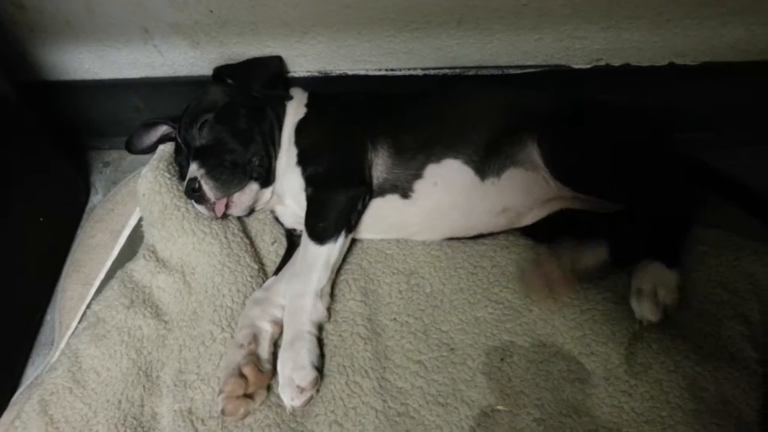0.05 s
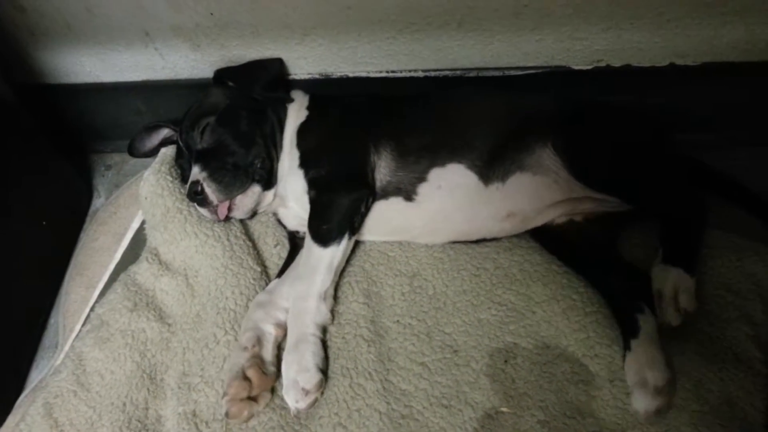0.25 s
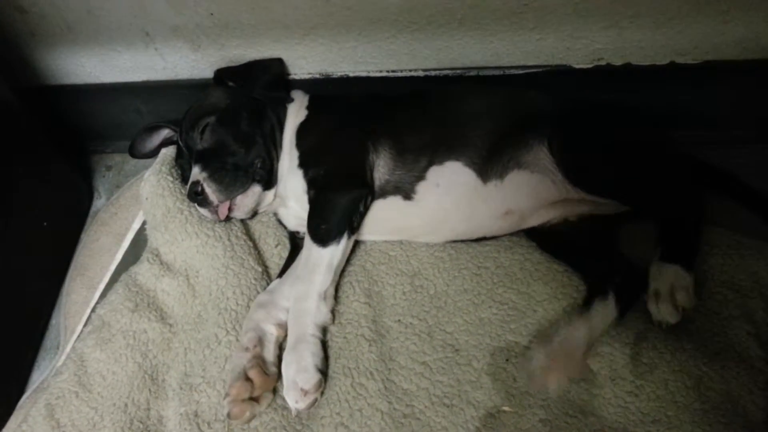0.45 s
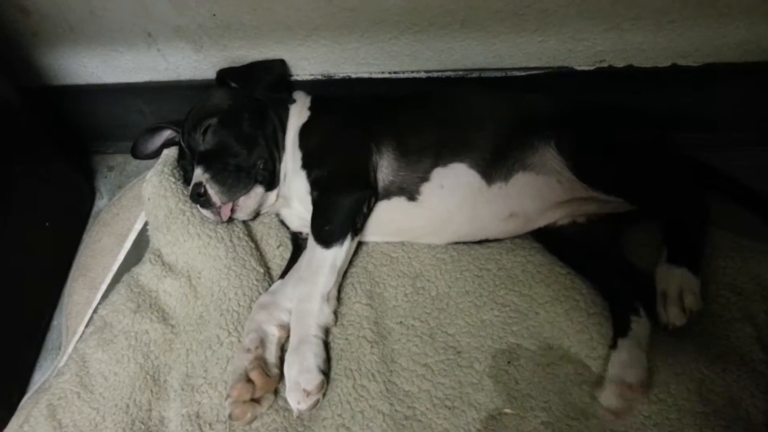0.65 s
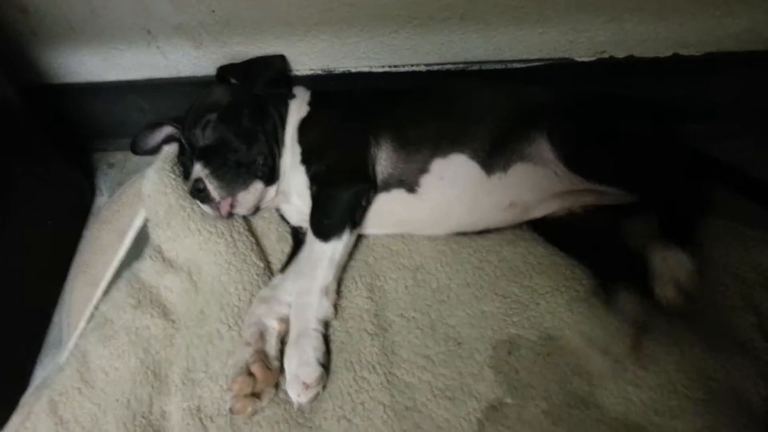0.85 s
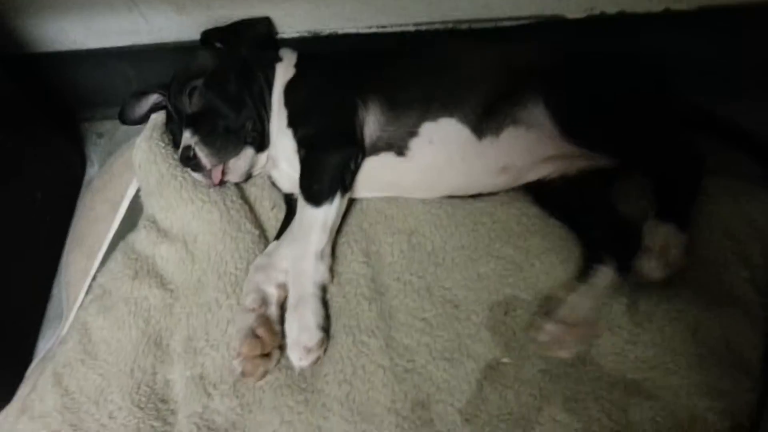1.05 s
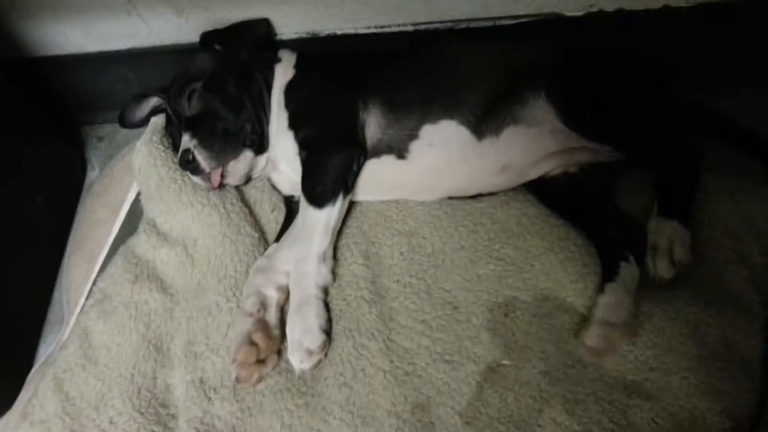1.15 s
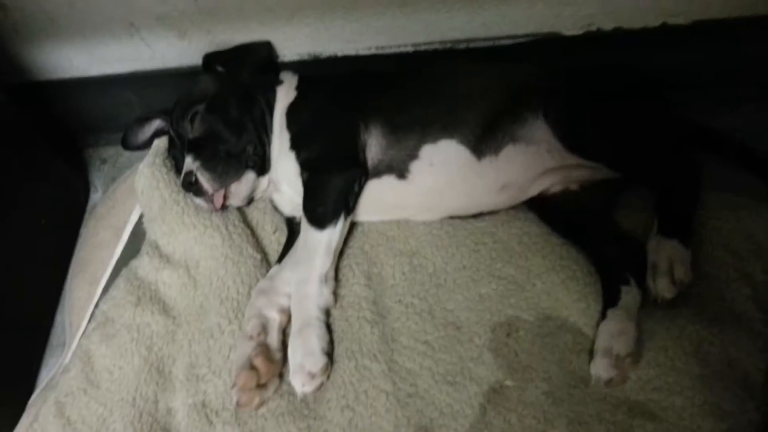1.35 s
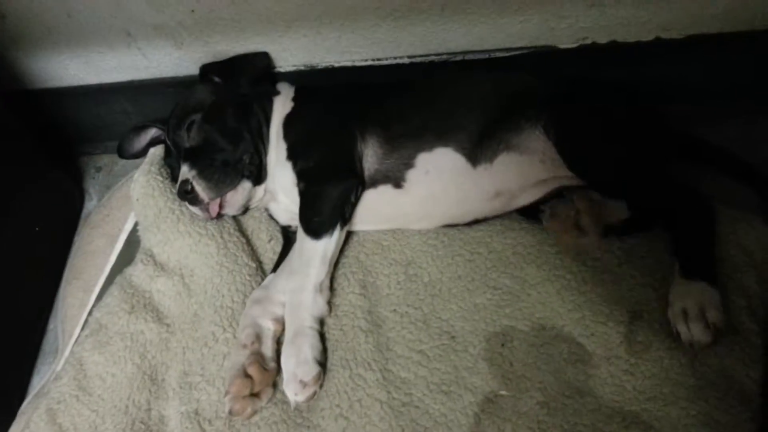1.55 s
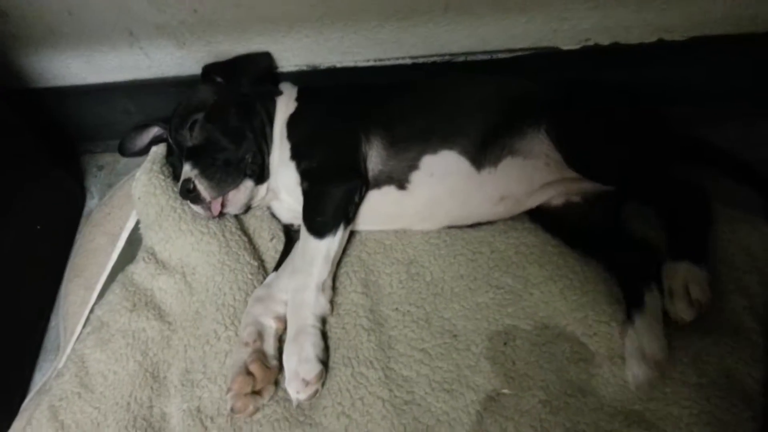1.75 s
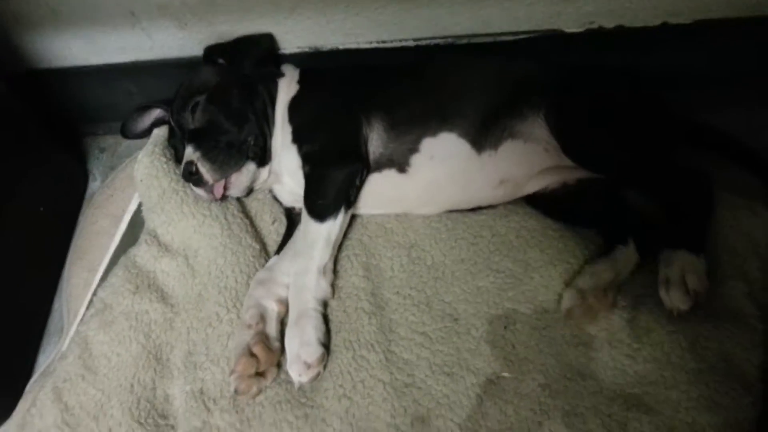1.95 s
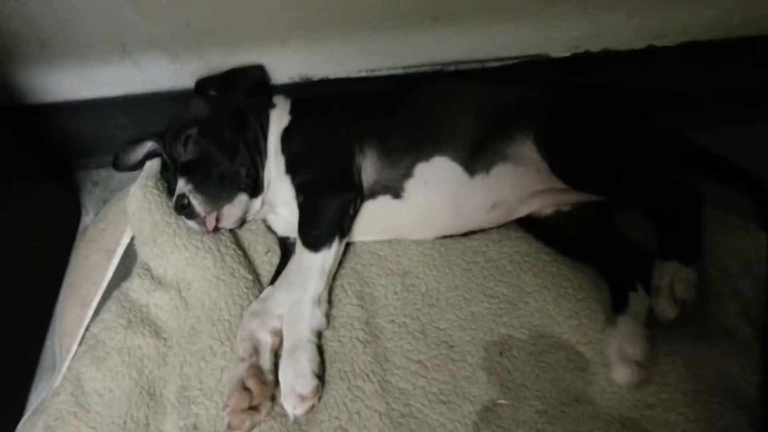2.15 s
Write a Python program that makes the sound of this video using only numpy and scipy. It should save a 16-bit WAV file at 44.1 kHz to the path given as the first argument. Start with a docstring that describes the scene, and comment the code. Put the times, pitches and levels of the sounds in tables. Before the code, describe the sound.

A sleeping puppy woofs softly four times with its mouth shut, each a hollow hoot with a thin squeak and husky rasp. Its legs faintly brush the blanket, over low hum and hiss in a bare, echoing room.

```python
"""In a bare, ringing room, a sleeping puppy woofs four times with its mouth shut.
Its vocal folds make thin squeaks and hollow, sagging hoots; the last three woofs open with a
hoarse upward slide. Air rushing through its throat adds a husky rasp.
Its twitching legs brush the blanket and bump the cushion, and lips and claws tick,
all over a faint hum and hiss."""
import sys
import numpy as np
from scipy import signal
from scipy.fft import rfft, irfft
from scipy.io import wavfile
from scipy.ndimage import uniform_filter1d, minimum_filter1d

SR = 44100
rng = np.random.default_rng(int(sys.argv[2]) if len(sys.argv) > 2 else 0)


def digitize_waveform(pressure):
    """Quantize a signal to 16-bit integers and store it at the path in sys.argv[1].

    Rows of a 2-D input are taken as channels; values are limited to [-1, 1].
    """
    field = np.atleast_2d(pressure).T
    bounded = np.clip(field, -1, 1)
    quanta = np.round(bounded * 32767).astype(np.int16)
    wavfile.write(sys.argv[1], SR, quanta)


N = 97020
T = np.arange(N) / SR

# tone colour of the room's hiss: f/Hz, level/dB
HISS_COLOUR = [(25, -19), (50, -13.5), (80, -4.5), (125, -9), (170, 0), (240, 8), (400, 8), (900, 8.5),
               (1700, -2), (2800, -9), (6000, -18.5), (14000, -20.5)]
# low hum: f/Hz, width/Hz, level/dB
HUM_TONES = [(80, 5.8, -60.5), (127, 19, -52)]
# how long the room's echo takes to fall by 60 dB: f/Hz, t/s
ECHO_TIMES = [(150, .8), (500, 1.29), (850, 1.3), (2000, 1.3), (5000, 2), (14000, .5)]
# tone colour of the brushed blanket: f/Hz, level/dB
BLANKET_COLOUR = [(40, -50), (300, -22), (1500, -7.5), (2800, -7.5), (4200, -7.5), (4550, 0), (4780, 1.5),
                  (5050, -2.5), (5600, -5), (8200, -5), (9200, -8), (10200, -7), (11400, -19),
                  (12800, -15.5), (13800, -2.5), (15000, -29.5)]
# how loud the brushing is: t/s, level/dB
BRUSH_LEVELS = [(0, -60), (.05, -46), (.11, -46.5), (.19, -56), (.29, -46.5), (.39, -47.5), (.43, -39),
                (.5, -47.5), (.67, -58), (1.12, -55.5), (1.16, -52), (1.4, -52.5), (1.76, -59), (1.94, -45),
                (2.07, -46), (2.15, -41.5), (2.2, -41)]
# paw bumps on the cushion: t/s, level/dB, f/Hz
PAW_THUDS = [(0.129, -42.5, 123.4), (1.832, -45, 122), (2.154, -42.5, 131.5)]
# ticks of lips and claws: t/s, level/dB, f/Hz, width/Hz, decay/s
SMALL_TICKS = [(.298, -33.5, 3320, 915, .005), (1.145, -50, 8330, 200, .04)]
# tone colour of air in the throat: f/Hz, level/dB
THROAT_COLOUR = [(40, -55), (110, -23.5), (250, -15), (380, -12), (440, 4.5), (650, 0), (900, 5.5),
                 (1080, -4), (1350, -4), (1750, -12), (2350, -19), (2650, -26), (4000, -35), (8000, -42.5),
                 (15000, -68)]
# rasp of each woof: t/s, length/s, level/dB, brightness/(dB per octave)
THROAT_RASPS = [(-.05, 0.058, -42.5, 6), (0.158, 0.23, -26, 2), (0.689, 0.18, -26, 0.5),
                (1.195, 0.26, -27, 0.5), (1.747, 0.2, -27.5, -2)]
# slides that open a woof: t/s, length/s, level/dB, start f/Hz, top f/Hz
RISING_SLIDES = [(0.646, 0.057, -33, 623, 833.6), (1.165, .07, -31.5, 549, 829.5),
                 (1.723, 0.0622, -32.5, 552.2, 832.5)]
# high voice: t/s, length/s, level/dB, start f/Hz, end f/Hz, jitter/share of pitch,
# half-pitch tones/dB, octave/dB
HIGH_SQUEAKS = [(-.02, 0.04, -36, 900, 834.4, 0.011, -32, -15.5),
                (.005, 0.059, -43, 942, 1017, 0.021, -25, -16),
                (0.088, 0.097, -35, 867.5, 850, 0.022, -17, -20.5),
                (0.245, 0.098, -22.5, 809.3, 821.4, .02, -52, -30.5),
                (0.663, 0.081, -33, 820, 819, 0.026, -30, -26),
                (1.225, 0.19, -24, 848.3, 827, .03, -19.5, -24),
                (1.806, 0.048, -22, 847.8, 848.4, 0.012, -15.5, -21.5),
                (1.932, 0.17, -29.5, 857, 845.5, 0.01398, -18.5, -24.5)]
# low hoots as heard in the ringing room, often swelling several times per woof:
# t/s, length/s, level/dB, start f/Hz, end f/Hz, jitter/share of pitch, overtones/dB
LOW_HOOTS = [(0.152, 0.063, -30, 575, 551, 0.021, -26), (0.225, .045, -17, 567.8, 566.2, 0.0087, -16.5),
             (.276, 0.055, -14, 567.5, 569, .004, -15.5), (0.379, .02, -25, 568.3, 562.3, .004, -33),
             (0.71, 0.074, -17.5, 548.1, 508.5, 0.019, -34.5), (0.805, .14, -15.5, 536, 497.9, 0.036, -40),
             (1.252, 0.094, -17.5, 518.8, 503, 0.057, -30), (1.351, 0.12, -18.5, 522.6, 481.4, 0.045, -31),
             (1.549, .015, -30.5, 496, 478, 0.009, -35), (1.804, 0.15, -26, 557.3, 478.8, 0.0961, -26)]

# direct sound compared with its echo, for hoots, higher tones and rough sounds
HOOT_DIRECT_DB, HIGH_DIRECT_DB, ROUGH_DIRECT_DB = 3, 2, -11


def amp(db):
    """Turns decibels into a gain."""
    return 10 ** (np.asarray(db) / 20)


def unit(x):
    """Scales a signal to an average strength (rms) of one."""
    return x / np.sqrt(np.mean(x ** 2) + 1e-20)


def look_up(points, hz):
    """Reads between the rows of a table, with pitch spaced in octaves."""
    f, value = np.transpose(points)
    return np.interp(np.log(hz + 1), np.log(f + 1), value)


def noise(colour):
    """Noise with the given tone colour."""
    gains = amp(look_up(colour, np.fft.rfftfreq(N, 1 / SR)))
    return unit(irfft(rfft(rng.standard_normal(N)) * gains, N))


def wander(rate_hz):
    """A smooth random wobble, mostly slower than the given rate."""
    gains = np.exp(-(np.fft.rfftfreq(N, 1 / SR) / rate_hz) ** 2)
    return unit(irfft(rfft(rng.standard_normal(N)) * gains, N))


def fuzzy_tone(hz, width):
    """A band of noise around one pitch."""
    wobble = wander(width) + 1j * wander(width)
    return unit((wobble * np.exp(2j * np.pi * hz * T)).real)


def background(hiss_db=-41):
    """Room hiss and a wavering low hum."""
    hiss = amp(hiss_db) * noise(HISS_COLOUR)
    return hiss + sum(amp(db) * fuzzy_tone(hz, width) for hz, width, db in HUM_TONES)


def in_room(x, direct_db):
    """Adds the echo of bare walls; the result has the energy of half a second at 0 dB."""
    hz, t, spectrum = signal.stft(rng.standard_normal(N), SR, nperseg=256)
    decay = amp(-60 * t / look_up(ECHO_TIMES, hz)[:, None])
    tail = signal.istft(spectrum * decay, SR, nperseg=256)[1][:N]
    echo = signal.fftconvolve(x, tail)[:N]
    return unit(amp(direct_db) * unit(x) + unit(echo)) * np.sqrt(.5 * SR / N)


def blanket(grain_db=1, grain_s=.006):
    """Paws drag over the blanket in fine, uneven grains."""
    level = amp(np.interp(T, *np.transpose(BRUSH_LEVELS)))
    return level * noise(BLANKET_COLOUR) * unit(amp(grain_db * wander(1 / grain_s)))


def thud(start, db, hz, rise_s=.02):
    """A paw bumps the cushion: a low tone swells and dies."""
    age = np.maximum(T - start, 0)
    return amp(db) * age / rise_s * np.exp(1 - age / rise_s) * np.sin(2 * np.pi * hz * age)


def tick(start, db, hz, width, decay):
    """A lip or claw makes a tiny, quickly dying scratch."""
    return amp(db) * fuzzy_tone(hz, width) * (T > start) * np.exp(-np.maximum(T - start, 0) / decay)


def rasp(start, length, db, tilt_db):
    """Air swirling in the throat swells and fades with each woof."""
    progress = np.clip((T - start) / length, 0, 1)
    swell = abs(np.sin(np.pi * progress ** .62))
    colour = [(hz, level + tilt_db * np.log2(hz)) for hz, level in THROAT_COLOUR]
    return amp(db) * in_room(swell * noise(colour), ROUGH_DIRECT_DB)


def vocal_folds(start, length, from_hz, to_hz, jitter, bend=1):
    """Loudness and phase of a shaky, gliding voice; a bend above 1 makes the glide come late."""
    attack_s, release_s, fade_db, shake_hz = .014, .04, -6.5, 68
    age = T - start
    progress = np.clip(age / length, 0, 1)
    release = np.exp(-np.maximum(age - length, 0) / min(release_s, length))
    level = np.clip(age / attack_s, 0, 1) * amp(fade_db * progress) * release
    glide = from_hz + (to_hz - from_hz) * progress ** bend
    hz = glide * (1 + jitter * wander(shake_hz))
    tremble = np.exp(.12 * wander(shake_hz))
    return level * tremble, 2 * np.pi * np.cumsum(hz) / SR


def slide(start, length, db, from_hz, to_hz, break_s=.031):
    """The hoarse voice swells as it climbs, then breaks off."""
    level, phase = vocal_folds(start, length, from_hz, to_hz, jitter=.05)
    swell = amp(14 * np.clip((T - start) / length, 0, 1))
    break_off = np.exp(-np.maximum(T - start - length, 0) / break_s)
    hoarse_tone = np.sin(phase + .8 * wander(rate_hz=110))
    return amp(db) * in_room(level * swell * break_off * hoarse_tone, HIGH_DIRECT_DB)


def squeak(start, length, db, from_hz, to_hz, jitter, half_db, octave_db):
    """A thin, high tone; strong and weak cycles add tones at 1, 3 and 5 times half its pitch."""
    level, phase = vocal_folds(start, length, from_hz, to_hz, jitter)
    halves = np.sin(phase / 2) + np.sin(3 * phase / 2) + amp(-11) * np.sin(5 * phase / 2)
    roughness = 1 + .75 * wander(rate_hz=45)
    extras = level * roughness * (amp(half_db) * halves + amp(octave_db) * np.sin(2 * phase))
    extras_gain = np.hypot(np.sqrt(2) * amp(half_db), amp(octave_db))
    tone = in_room(level * np.sin(phase), HIGH_DIRECT_DB)
    return amp(db) * (tone + extras_gain * in_room(extras, ROUGH_DIRECT_DB))


def hoot(start, length, db, from_hz, to_hz, jitter, overtone_db, flutter_hz=31):
    """A nearly pure tone that tends to sag, with a fast flutter in loudness; shut lips muffle it."""
    level, phase = vocal_folds(start, length, from_hz, to_hz, jitter, bend=1.84)
    flutter = np.sin(2 * np.pi * flutter_hz * (T - start) + wander(flutter_hz / 2))
    level = level * (1 + min(7.9 * jitter, 1) * flutter)
    roughness = 1 + .31 * wander(rate_hz=40)
    overtones = level * roughness * (np.sin(2 * phase) + amp(-20.5) * np.sin(3 * phase))
    tone = in_room(level * np.sin(phase), HOOT_DIRECT_DB)
    return amp(db) * (tone + amp(overtone_db) * in_room(overtones, HIGH_DIRECT_DB))


def scene():
    """Adds the room, the bedding and the puppy into one channel."""
    mix = blanket() + background()
    sources = [(hoot, LOW_HOOTS), (squeak, HIGH_SQUEAKS), (slide, RISING_SLIDES),
               (rasp, THROAT_RASPS), (tick, SMALL_TICKS), (thud, PAW_THUDS)]
    for source, rows in sources:
        mix += sum(source(*row) for row in rows)
    return mix[None]


def record(dry):
    """Turns down any peak above full scale, then trims the deepest bass and highest treble."""
    low_cut_hz, high_cut_hz, window = 44, 14700, 221  # the window lasts 5 ms
    gain = uniform_filter1d(minimum_filter1d(1 / np.maximum(abs(dry), 1), window), window)
    bass_cut = signal.butter(2, low_cut_hz, "highpass", fs=SR, output="sos")
    treble_cut = signal.firwin(511, high_cut_hz, window=("kaiser", 9), fs=SR)
    return signal.oaconvolve(signal.sosfilt(bass_cut, dry * gain), treble_cut[None], "same")


dry = scene()
out = record(dry)
digitize_waveform(out)
```